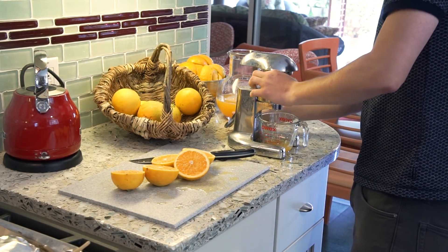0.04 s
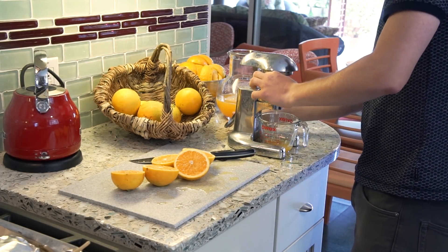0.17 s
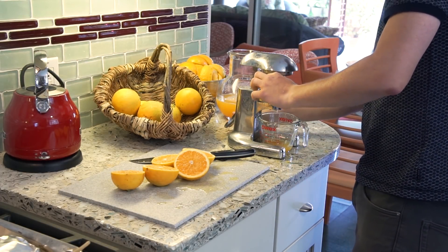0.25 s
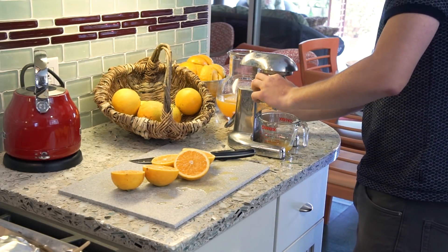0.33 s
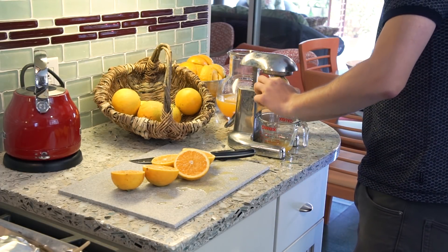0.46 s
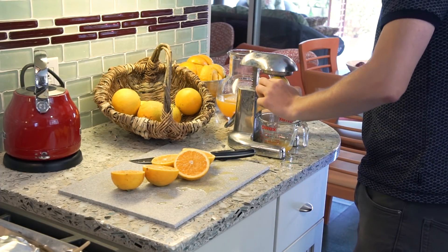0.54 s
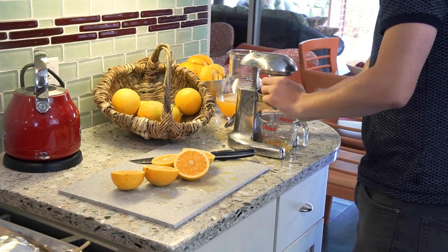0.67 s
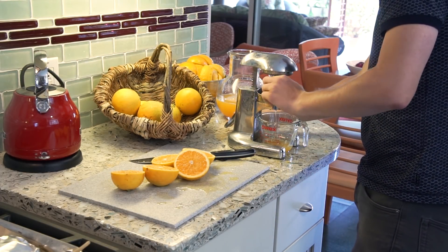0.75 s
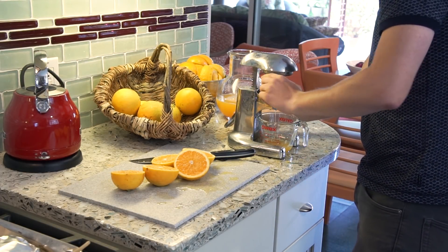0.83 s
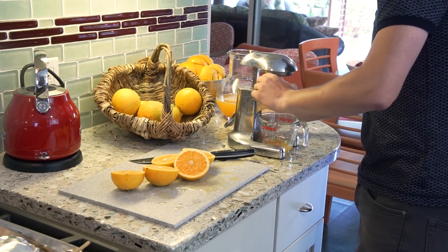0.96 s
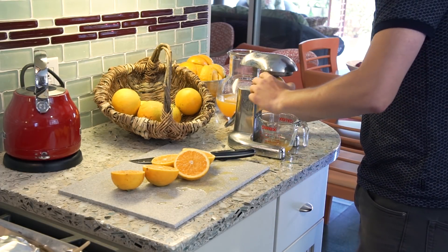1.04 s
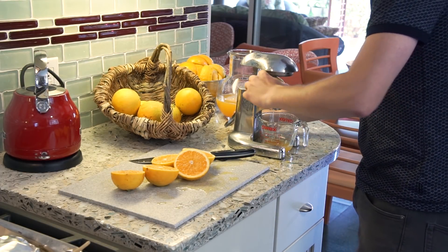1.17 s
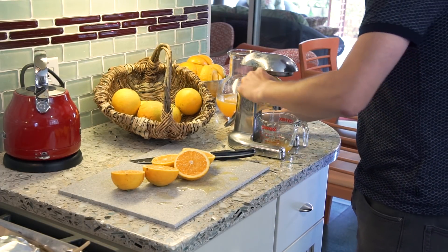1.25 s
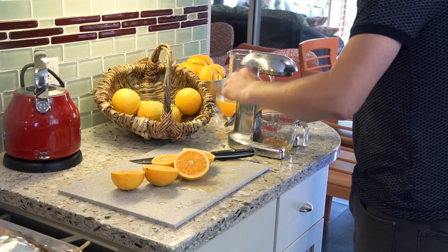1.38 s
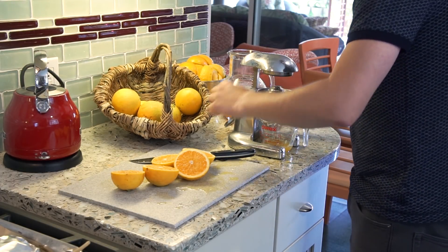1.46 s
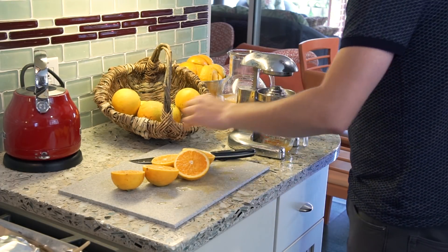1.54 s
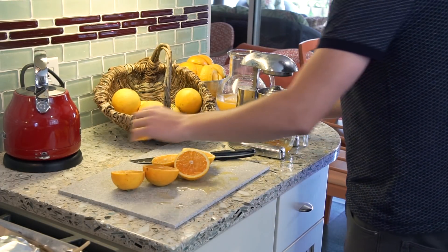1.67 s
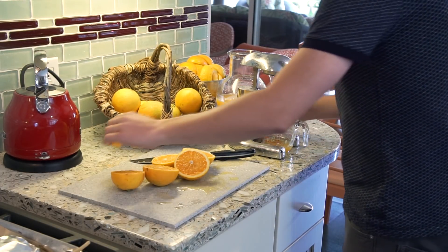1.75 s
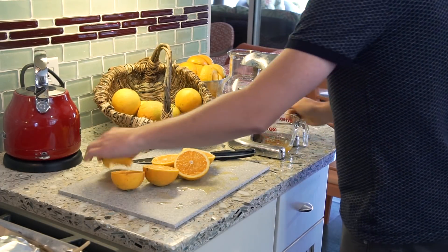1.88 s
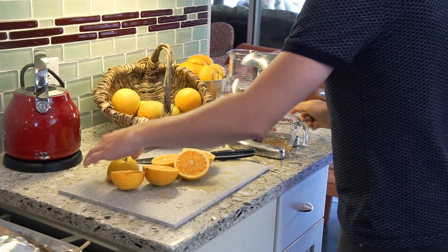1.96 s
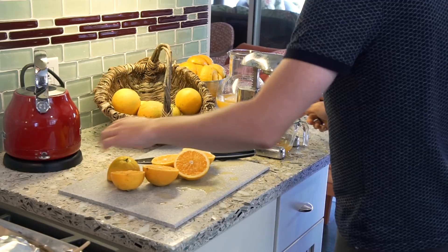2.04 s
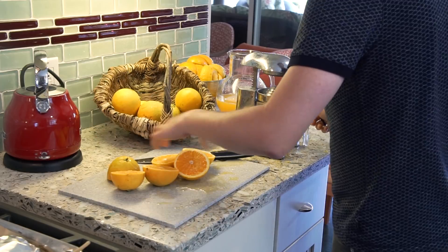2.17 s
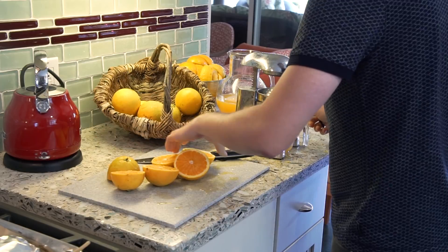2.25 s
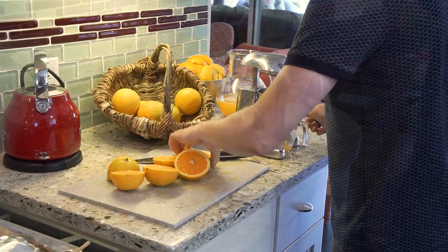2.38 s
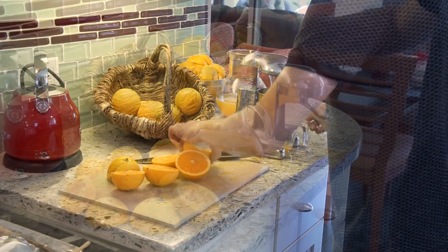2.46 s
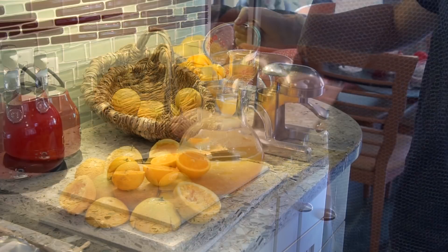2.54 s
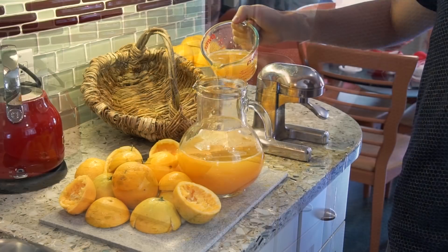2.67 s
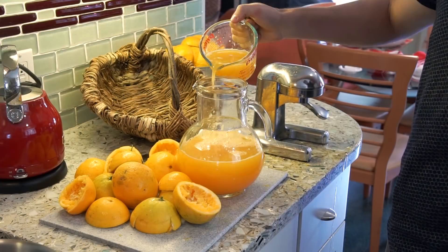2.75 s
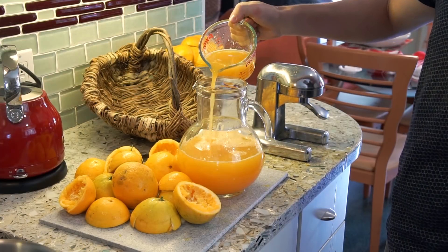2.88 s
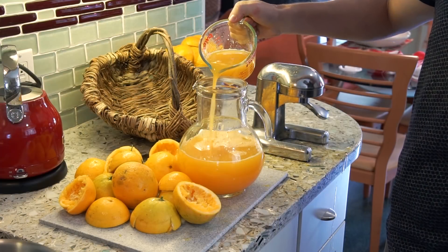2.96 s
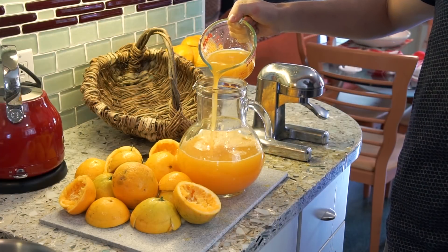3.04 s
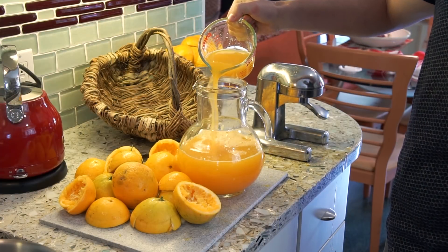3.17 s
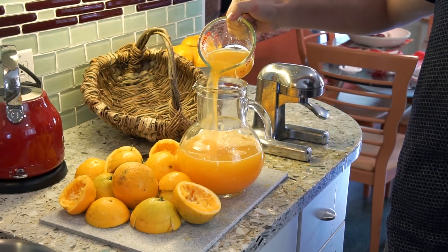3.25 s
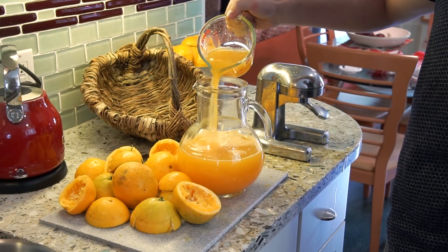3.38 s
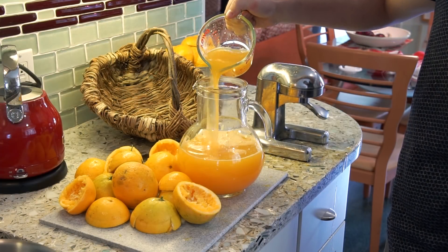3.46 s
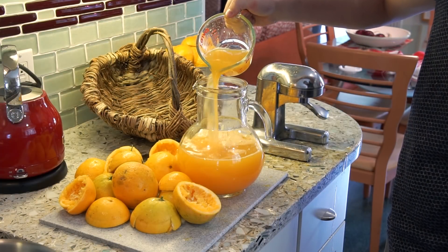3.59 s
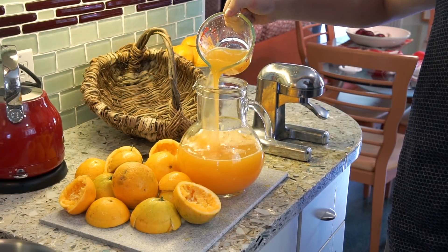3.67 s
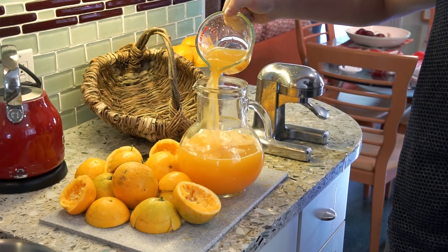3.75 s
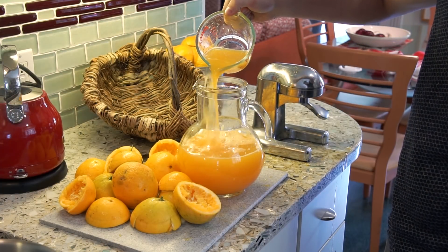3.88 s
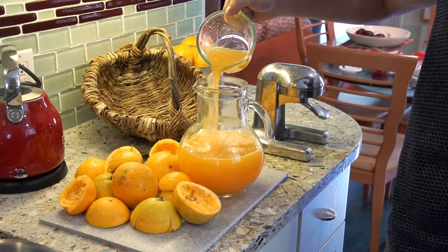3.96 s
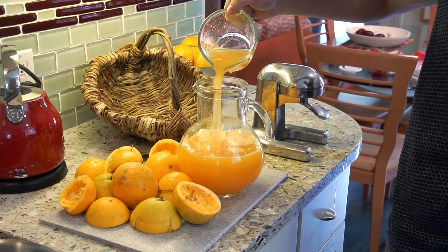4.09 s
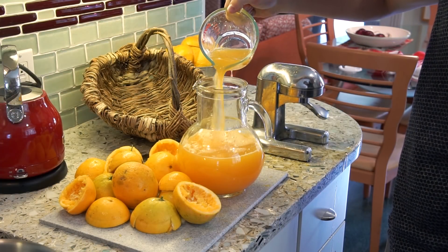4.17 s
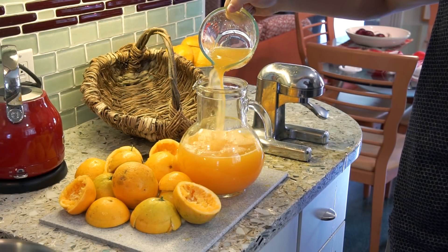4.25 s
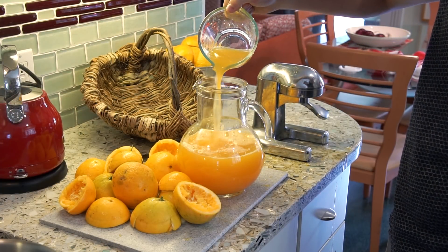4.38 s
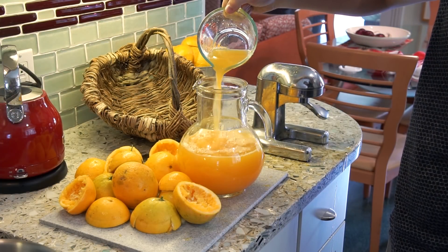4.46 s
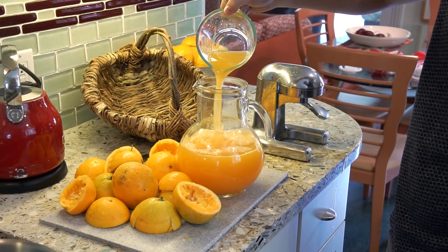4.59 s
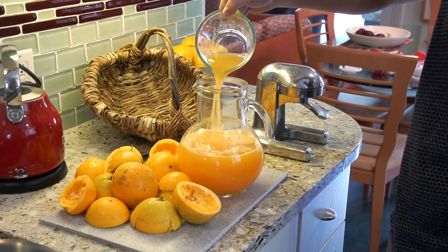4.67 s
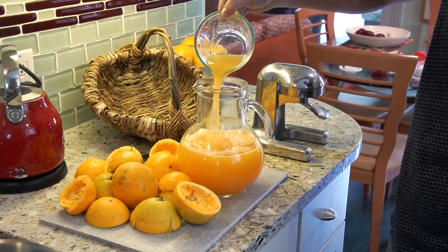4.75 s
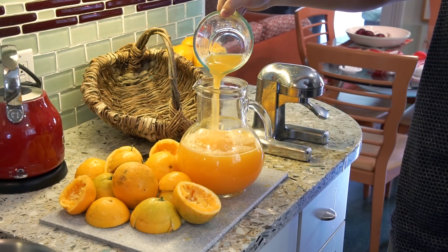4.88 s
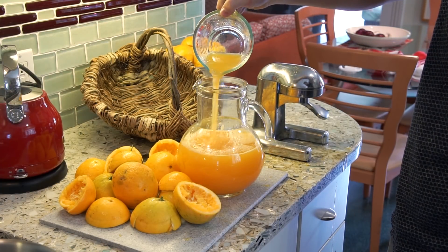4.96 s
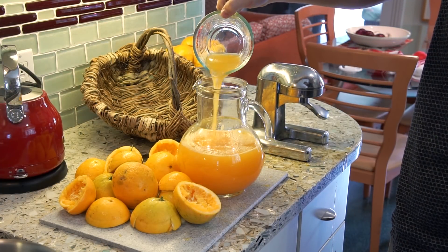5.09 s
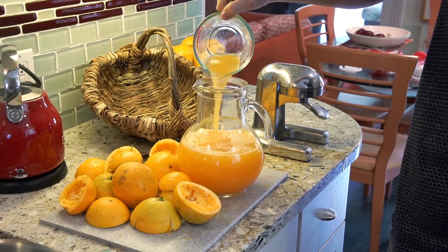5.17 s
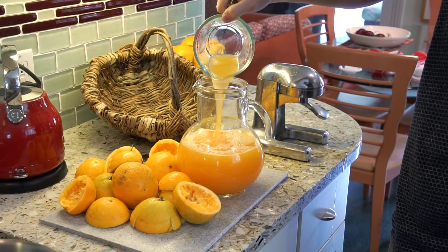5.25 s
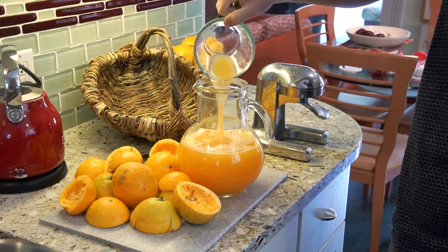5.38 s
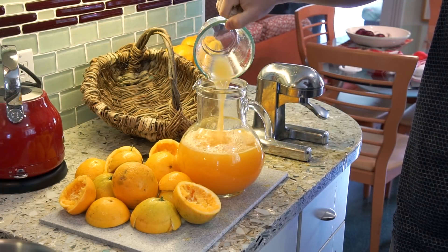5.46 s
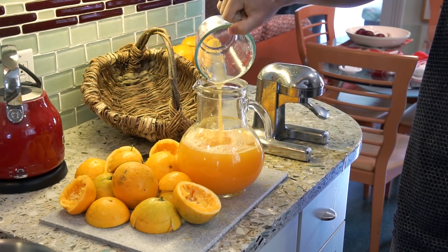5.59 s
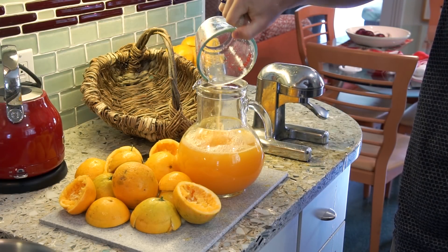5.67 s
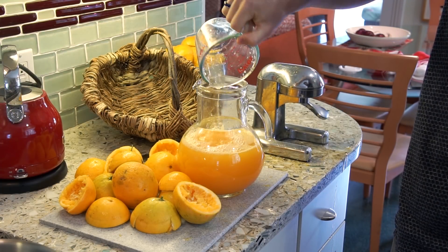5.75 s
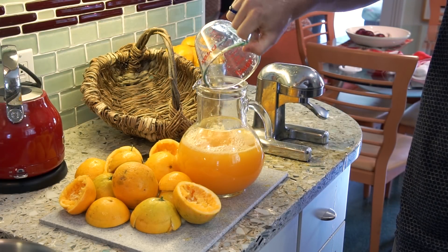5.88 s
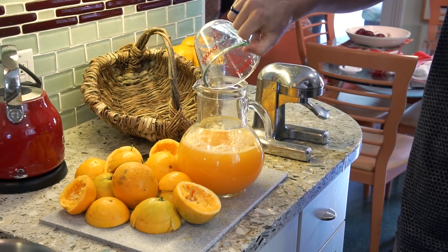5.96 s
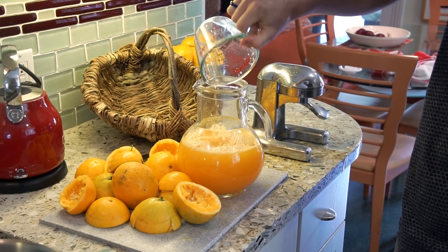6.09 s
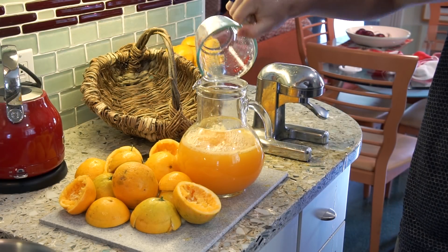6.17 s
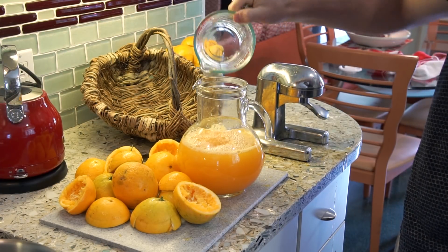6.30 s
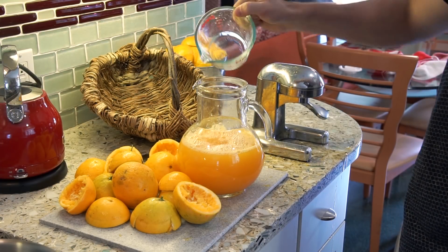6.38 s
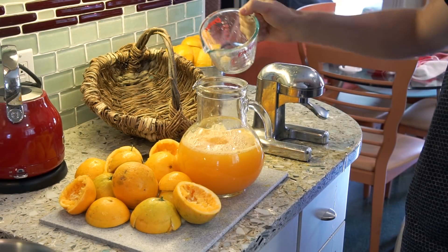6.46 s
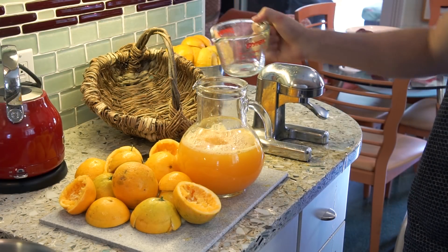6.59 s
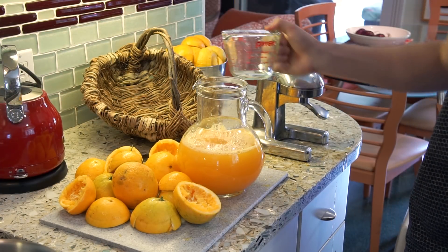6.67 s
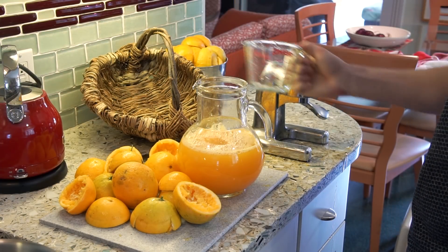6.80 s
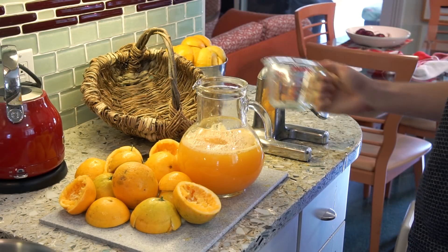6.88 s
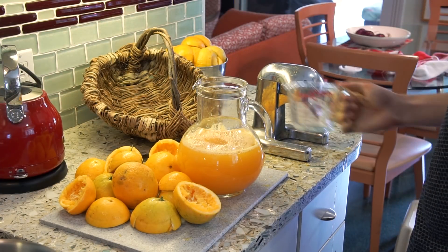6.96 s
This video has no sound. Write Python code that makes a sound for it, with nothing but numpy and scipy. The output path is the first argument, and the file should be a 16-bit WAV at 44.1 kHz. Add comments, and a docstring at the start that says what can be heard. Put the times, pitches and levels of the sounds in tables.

```python
"""Tiled kitchen: a metal lever juicer clanks on a stone counter under a steady rush of air.
Clanks are rattling noise bursts plus ringing modes of the cast body; the lever adds high clear notes.
Then orange juice runs from a glass cup into a pitcher: random ticks and short rising sines, rung by
the pitcher's air, make the spatter; sine gulps gurgle at a rising pitch; grains make the pulp slop in.
The cup clinks on the rim as the pour begins and ends, and the last drops plink."""
import sys
import numpy as np
from scipy import signal
from scipy.io import wavfile
from scipy.ndimage import uniform_filter1d

SR = 44100
rng = np.random.default_rng(int(sys.argv[2]) if len(sys.argv) > 2 else 0)


def dump(signal):
    """Clip the signal to [-1, 1] and save it as 16-bit WAV at the path in sys.argv[1]."""
    limited = np.clip(np.atleast_2d(signal).T, -1, 1)
    pcm = np.round(limited * 32767).astype(np.int16)
    wavfile.write(sys.argv[1], SR, pcm)


N = 310023
TIME_S = np.arange(N) / SR
RING_S = TIME_S[:SR // 2]  # time axis of one blow or note
BUBBLE_RISE = .054  # half the share by which a bubble climbs in pitch over its t60
LOW_HZ, FULL_HZ, NARROWING = 423.7, 535.7, 2.82  # gurgle before and after the pour; exponent of its climb
GURGLE_DB, GURGLE_DB_PER_FLOW_DB = -44.5, 0.83  # at full flow; dB per dB of flow
GULP_S, GULP_RISE = .16, 0.11  # length of a big gulp; its climb in pitch, as a share


def amp(db):
    """Decibels to gain."""
    return 10 ** (np.asarray(db) / 20)


def unit(x):
    """Scales to rms 1."""
    return x / np.sqrt(np.mean(x ** 2) + 1e-20)


def read(points, hz):
    """Reads a curve on a log-frequency axis."""
    point_hz, value = np.transpose(points)
    return np.interp(np.log(hz + 1), np.log(point_hz + 1), value)


def colour(x, points):
    """Filters by a spectrum in dB, with a minimum-phase, causal response."""
    size = 4096
    gain_db = read(points, abs(np.fft.fftfreq(size, 1 / SR)))
    log_gain = np.log(amp(gain_db))
    taps = np.fft.ifft(np.exp(np.conj(signal.hilbert(log_gain)))).real
    return signal.fftconvolve(x, taps[:size // 2])[:len(x)]


def resonate(x, hz, width_hz):
    """A resonance of peak gain 1: shifts hz to zero, smooths with one pole, shifts back."""
    turn = np.exp(2j * np.pi * np.cumsum(hz * np.ones(len(x))) / SR)
    pole = np.exp(-np.pi * width_hz / SR)
    smooth = signal.lfilter([1 - pole], [1, -pole], x / turn + 1e-18)
    return 2 * (turn * smooth).real


def burst(t60_s):
    """A contact that rattles out: decaying white noise."""
    return rng.standard_normal(len(RING_S)) * amp(-60 * RING_S / t60_s)


def ring(modes, t60_s):
    """Dying modes; each blow shares its force among them differently, and the grip detunes them a little."""
    sign = rng.choice([-1, 1], len(modes))
    uneven, detune = rng.standard_normal((2, len(modes)))
    tones = np.zeros(len(RING_S))
    for k, (hz, db) in enumerate(modes):
        own_hz = hz * (1 + 0.0035 * detune[k])
        tones += sign[k] * amp(db + 2 * uneven[k]) * np.cos(2 * np.pi * own_hz * RING_S)
    return tones * amp(-60 * RING_S / t60_s)


def blow(x, db):
    """Sets the rms level of a blow's first 20 ms."""
    return amp(db) * x / np.sqrt(np.mean(x[:SR // 50] ** 2) + 1e-20)


def add(mix, s, sound):
    """Mixes a sound in at a time in seconds."""
    part = mix[max(round(s * SR), 0):][:len(sound)]
    part += sound[:len(part)]


def kitchen(x, near_db, room_db, near_t60_s=0.029):
    """Direct sound, quick reflections from counter and tiles, and the tail of the room."""
    # Each row: frequency in Hz, t60 in s.
    tail_t60 = [(200, 0.5), (1200, 0.44), (4000, 0.39), (16000, 0.23)]
    echoes_per_s = np.array([[900], [4000]])
    noise = rng.standard_normal((2, len(RING_S)))
    near, far = noise * (rng.random((2, len(RING_S))) < echoes_per_s / SR)
    near = near * amp(-60 * RING_S / near_t60_s) * (RING_S > .001)
    # the tail dies at its own rate in each band
    hz, t, z = signal.stft(far * (RING_S > .008), SR, nperseg=256)
    decay = amp(-60 * t / read(tail_t60, hz)[:, None])
    far = signal.istft(z * decay, SR, nperseg=256)[1][:len(RING_S)]
    echo = amp(near_db) * near / np.linalg.norm(near) + amp(room_db) * far / np.linalg.norm(far)
    return x + signal.fftconvolve(x, echo)[:len(x)]


def juicer(modes_db=-1, body_t60_s=0.15, part_width_hz=42, ring_db_per_db=0.2):
    """Loose metal parts chatter for a moment and ring the cast body; the stone counter passes little bass."""
    # Blows. Each row: start in s, level in dB, chatter t60 in s, edge above 6.2 kHz in dB,
    # pitch of the part struck in Hz, its ring in dB against the rest.
    clanks = [(.003, -30.5, 0.36, -4.5, 809, -1.5), (0.0552, -22.5, 0.023, -3, 3670, -5),
              (0.0588, -25, 0.069, 8.5, 895, 1.5), (0.336, -31.5, 0.025, -6, 1097, -7.5),
              (0.751, -37.5, 0.087, -8, 3200, -11), (0.871, -30.5, 0.095, 9, 7340, -6),
              (0.8799, -24.5, 0.043, 1, 1029, 0), (.963, -28.5, 0.047, -3.5, 1014, -11),
              (1.053, -34, 0.03, -2, 2043, 4), (1.07, -37, 0.04, -3, 1860, -1),
              (1.093, -31.5, 0.019, -8, 1053, 4), (1.3657, -25.5, 0.053, 0, 1150, 6),
              (1.379, -18, 0.056, -4, 3420, -7), (1.392, -27.5, 0.16, 12, 1043, -3.5),
              (1.412, -25, 0.05, 0, 1164, -3.5)]
    # Modes of the cast body. Each row: frequency in Hz, relative level in dB.
    metal_modes = [(824, -1.5), (1021, 7.5), (1235, 5.5), (1378, -5.5), (1840, 4.5), (2895, -7), (3070, -3),
                   (3380, -16), (3730, -14), (4560, -4.5), (7390, -12.5)]
    # Metal on metal. Each row: frequency in Hz, relative density in dB per Hz.
    crack_spectrum = [(75, -70), (524, -7.5), (727, -13), (1030, -26), (1460, -0.5), (1860, -10),
                      (2530, -17.5), (3450, -6.5), (4590, -13), (6300, -25), (9210, -24.5), (16000, -38.5)]
    part_ref_hz, low_db, low_db_per_octave = 1000, -5, 0.5  # gain below 1.9 kHz, by the part's pitch
    out = np.zeros(N)
    hardest_db = max(row[1] for row in clanks)
    for s, db, chatter_t60_s, edge_db, part_hz, part_db in clanks:
        body_db = low_db + low_db_per_octave * np.log2(part_hz / part_ref_hz)
        # lighter blows ring the body less
        ring_db = modes_db + ring_db_per_db * (db - hardest_db)
        crack = blow(colour(burst(chatter_t60_s), crack_spectrum), 0)
        metal = crack + blow(ring(metal_modes, body_t60_s), ring_db)
        metal = colour(metal, [(1900, body_db), (2700, 0), (4900, 0), (6200, edge_db)])
        width_hz = part_width_hz * np.sqrt(part_hz / part_ref_hz)
        part = resonate(burst(chatter_t60_s), part_hz, width_hz)
        part = resonate(part, part_hz, part_hz / 2)
        struck = blow(metal, 0) + blow(part, part_db)
        add(out, s, blow(kitchen(struck, near_db=1.5, room_db=1.0), db))
    return signal.sosfilt(signal.butter(2, 150, "high", fs=SR, output="sos"), out)


def open_room(x, db=-19, t60_s=1.35):
    """Clanks linger faintly in the dining room beyond the counter: a long, coloured noise tail."""
    t = TIME_S[:2 * SR]
    decay = amp(-60 * t / t60_s)
    tail = colour(rng.standard_normal(len(t)) * decay, [(400, 5), (1100, -2.5), (3500, -2.0), (9000, 5.0)])
    return x + amp(db) * signal.fftconvolve(x, tail / np.linalg.norm(decay))[:N]


def lever():
    """The steel lever swings free and sings on: a high, clear note with a weaker one below it."""
    # Each row: start in s, level in dB, pitch in Hz, t60 in s.
    lever_rings = [(0.058, -34, 4450, 0.2), (0.334, -43, 4447, 0.13), (.871, -34, 4600, 0.27),
                   (0.964, -42, 4570, 0.19)]
    low_ratio, low_db = .675, -5
    out = np.zeros(N)
    for s, db, hz, t60_s in lever_rings:
        turn = 2 * np.pi * hz * RING_S
        note = np.sin(turn) + amp(low_db) * np.sin(low_ratio * turn)
        note = note * amp(-60 * RING_S / t60_s)
        add(out, s, blow(kitchen(note, near_db=-9, room_db=-9), db))
    return out


def jolts(knock_t60_s=0.14):
    """The juicer's heavy foot jolts: dull noise knocks of the counter."""
    # Each row: start in s, level in dB.
    foot_jolts = [(0.061, -35.5), (1.058, -34), (1.413, -38.5)]
    # The counter. Each row: frequency in Hz, relative density in dB per Hz.
    knock_spectrum = [(120, -38), (220, -6.5), (500, 7.5), (800, -1), (1700, 4), (5000, -25)]
    out = np.zeros(N)
    for s, db in foot_jolts:
        knock = colour(burst(knock_t60_s), knock_spectrum)
        add(out, s, blow(kitchen(knock, near_db=0.0, room_db=1), db))
    return out


def juice_flow():
    """Strength of the stream: every tilt of the cup builds, swells and ebbs by one rule."""
    # Trickle, main pour, dregs. Each row: start in s, start of the ebb in s,
    # level in dB ahead of the swell and of the stream's trim.
    pours = [(2.81, 3.15, -54), (3.17, 4.92, -39.5), (5.238, 5.52, -43)]
    build_s, swell_db_per_s, ebb_db_per_s = 0.2, 0.32, 33  # the swell runs on under the ebb
    flow = np.zeros(N)
    for start, ebb, db in pours:
        swell_db = swell_db_per_s * (TIME_S - start)
        ebb_db = ebb_db_per_s * np.maximum(TIME_S - ebb, 0)
        flow += np.clip((TIME_S - start) / build_s, 0, 1) * amp(db + swell_db - ebb_db)
    return flow


def bubble(hz, t60_s, rise):
    """A pocket of air rings and climbs in pitch as it nears the surface."""
    t = RING_S[:int(t60_s * SR)]
    tone = np.sin(2 * np.pi * hz * t * (1 + rise * t / t60_s))
    return tone * amp(-60 * t / t60_s) * (1 - np.exp(-t * hz))


def pitcher(x, direct_db=-3):
    """Sound made at the surface rings the air modes of the pitcher on its way out."""
    # Each row: frequency in Hz, relative density in dB per Hz.
    spatter_spectrum = [(350, -81), (600, -32), (698, -20), (1140, -1.5), (1610, 7.5), (1780, -33),
                        (2570, -17), (2950, -1), (3730, 2), (12200, -4.5), (16000, -10.5)]
    # Each row: frequency in Hz, width in Hz, gain in dB.
    air_modes = [(1662, 34.5, 9.5), (2986, 84, 4.5), (3940, 69, -4)]
    x = colour(x, spatter_spectrum)
    return amp(direct_db) * x + sum(amp(db) * resonate(x, hz, width_hz) for hz, width_hz, db in air_modes)


def stream(ticks_per_s=1300, bubbles_db=-1, beads_db=6, spatter_db=-1.1, count=3200):
    """Tiny impacts and separate little bubbles follow the flow."""
    ticks = rng.standard_normal(N) * (rng.random(N) < ticks_per_s / SR)
    fizz = np.zeros(N)
    for when, size, length, strength in rng.random((count, 4)):
        hz, cycles, db = 3000 * 5 ** size, 14 + 40 * length, 10 * strength
        level = amp(db) * np.sqrt(np.sqrt(hz) / cycles)
        add(fizz, when * N / SR, level * bubble(hz, cycles / hz, BUBBLE_RISE))
    # the stream breaks into beads, so the impacts come in clumps
    clumps = unit(uniform_filter1d(rng.standard_normal(N), size=700))
    beads = amp(beads_db * np.clip(clumps, -2, 2))
    surface = pitcher(unit(beads * ticks) + amp(bubbles_db) * unit(fizz))
    spatter = unit(kitchen(surface, near_db=-4, room_db=-7))
    return amp(spatter_db) * juice_flow() * spatter


def gulp(hz, length_s):
    """A big pocket of air swells, climbs in pitch and fades."""
    t = np.arange(0, length_s, 1 / SR)
    turns = np.cumsum(hz * (1 + GULP_RISE * (t - length_s / 2) / GULP_S)) / SR
    return np.sin(2 * np.pi * (turns + rng.random())) * np.sin(np.pi * t / length_s) ** 2


def gurgle(small_s=0.062, scatter=0.0547, uneven_db=2, count=220):
    """The stream drags down air in quick small gulps, whose note climbs as the pitcher fills, and big ones."""
    # Big gulps. Each row: middle in s, level in dB ahead of the echoes, mid pitch in Hz.
    big_gulps = [(3.47, -37.5, 420), (3.61, -41, 418), (4.538, -37, 439.5), (5.04, -37.5, 466.7),
                 (5.678, -40, 452.6)]
    flow, out = juice_flow(), np.zeros(N)
    # the glass narrows upward, so the note climbs ever faster with the share poured
    poured = np.cumsum(flow) / flow.sum()
    note_hz = LOW_HZ + (FULL_HZ - LOW_HZ) * poured ** NARROWING
    for k, (late, detune, size) in enumerate(rng.standard_normal((count, 3))):
        at = int(np.clip((k + np.tanh(late) / 2) * N / count, 0, N - 1))
        follow = (flow[at] / flow.max()) ** GURGLE_DB_PER_FLOW_DB
        strength = follow * amp(GURGLE_DB + uneven_db * size)
        own_hz = note_hz[at] * (1 + scatter * detune)
        add(out, at / SR - small_s / 2, strength * gulp(own_hz, small_s))
    for s, db, hz in big_gulps:
        add(out, s - GULP_S / 2, amp(db) * gulp(hz, GULP_S))
    return kitchen(out, near_db=-15, room_db=-4.5)


def splats(dent_db=0, dent_q=6):
    """The stream breaks and slaps the surface; the dent that it leaves colours each slap."""
    # Each row: start in s, level in dB, pitch of the dent in Hz.
    slaps = [(3.131, -35.5, 6400), (3.567, -37, 6900), (3.7345, -27, 5820), (3.877, -31, 4200),
             (4.004, -35, 10000), (4.082, -31.5, 3200), (4.182, -31, 4350), (4.284, -35, 3480),
             (4.346, -35.5, 3200), (4.424, -35.5, 3330), (4.758, -35, 3450), (5.103, -38.5, 6740),
             (5.453, -42, 3480)]
    out = np.zeros(N)
    for s, db, hz in slaps:
        slap = burst(.021)
        dent = resonate(resonate(slap, hz, hz / dent_q), hz, hz / 2)
        slap = colour(pitcher(slap), [(1500, -4), (5500, 11.0), (14000, 5)])
        landed = blow(slap, 0) + blow(dent, dent_db)
        add(out, s, blow(kitchen(landed, near_db=5.5, room_db=4.5), db))
    return out


def cluster(hz, cycles, count=3):
    """A pocket of air rings and sheds a few weaker bubbles of nearly its own pitch."""
    mean_delay_s, pitch_spread, shed_db = .008, .06, -8
    out = np.zeros(len(RING_S))
    add(out, 0, bubble(hz, cycles / hz, BUBBLE_RISE))
    for late_s, detune in zip(rng.exponential(mean_delay_s, count), rng.standard_normal(count)):
        own_hz = hz * np.exp(pitch_spread * detune)
        add(out, late_s, amp(shed_db) * bubble(own_hz, cycles / own_hz, BUBBLE_RISE))
    return out


def bubbles(t60_cycles=56):
    """Larger pockets of air under the stream, each with its own note; the higher ones die sooner."""
    # Each row: start in s, level in dB ahead of the echoes, pitch in Hz.
    pockets = [(2.929, -30, 1340), (3.146, -33.5, 2026), (3.172, -32, 1353), (3.213, -31, 3320),
               (3.355, -29.5, 5400), (3.436, -24, 4390), (3.559, -22.5, 3150), (3.894, -24, 4940),
               (3.91, -22, 3760), (3.961, -30, 3420), (4.031, -28, 5900), (4.143, -27, 3260),
               (4.229, -24, 7600), (4.264, -26, 3660), (4.463, -27, 5550), (4.536, -31, 2990),
               (4.97, -30.5, 1330), (5.013, -31, 5270), (5.519, -24, 3300)]
    out = np.zeros(N)
    for s, db, hz in pockets:
        note = cluster(hz, t60_cycles)
        add(out, s, amp(db) * kitchen(note, near_db=4.0, room_db=1))
    return out


def slops(grains_per_s=5000, plop_db=-16):
    """Thick pulp lands in a dense, wide swell of tiny impacts around a hollow plop."""
    # Lumps. Each row: peak in s, level in dB ahead of weight and echoes, rise in s, fall in s,
    # pitch of the plop in Hz, weight below 900 Hz in dB.
    lumps = [(4.703, -33.5, 0.041, 0.019, 241, -2), (4.98, -43.5, 0.08, 0.13, 1660, 0),
             (5.547, -27.5, 0.014, 0.017, 1000, -0.5)]
    # Each row: frequency in Hz, relative density in dB per Hz.
    pulp_spectrum = [(125, -32), (230, -10.5), (547, 4), (1080, -6), (1610, -1), (2000, -9.5),
                     (6700, -10.5), (16000, -15.5)]
    out = np.zeros(N)
    for s, db, rise_s, fall_s, hz, weight_db in lumps:
        impacts = rng.standard_normal(N) * (rng.random(N) < grains_per_s / SR)
        grains = unit(colour(impacts, pulp_spectrum))
        plop = unit(resonate(resonate(grains, hz, hz / 10), hz, hz / 2))
        grains = colour(grains, [(900, weight_db), (1400, 0)])
        swell = np.exp(-np.maximum((s - TIME_S) / rise_s, (TIME_S - s) / fall_s))
        out += amp(db) * swell * (grains + amp(plop_db) * plop)
    return kitchen(out, near_db=-13.0, room_db=-1.0)


def clink(rim_t60_s=0.083):
    """The cup's lip chatters on the pitcher's rim; the hand damps the cup, while the rim rings clear."""
    # Each row: start in s, level in dB, ring of the rim against the cup in dB.
    touches = [(2.9, -37, 7), (5.737, -29, -25)]
    # Modes of the cup's lip. Each row: frequency in Hz, relative level in dB.
    cup_modes = [(3530, -2), (3700, -4.5), (4190, -1), (4700, 8)]
    # Modes of the pitcher's rim. Each row: frequency in Hz, relative level in dB.
    rim_modes = [(1650, 7), (2982, 3), (3640, 3), (4020, 3)]
    out = np.zeros(N)
    for s, db, rim_db in touches:
        cup = blow(ring(cup_modes, .018), -8) + blow(burst(0.045), 0)
        cup = colour(cup, [(2000, -31), (3300, 7.5), (4800, 2.0), (5300, -9), (7000, 1.5), (15000, -30)])
        touch = blow(cup, 0) + blow(ring(rim_modes, rim_t60_s), rim_db)
        add(out, s, blow(kitchen(touch, near_db=-5, room_db=-2.5), db))
    return out


def drips(t60_s=0.06):
    """Lone drops, from the juicer and later the cup's lip: each a short, clean sine plink."""
    # Each row: start in s, level in dB ahead of the echoes, pitch in Hz.
    drops = [(1.709, -38.5, 2180), (1.894, -40.5, 2790), (3.698, -29.5, 2410), (5.964, -39.5, 2100),
             (6.088, -34, 2090), (6.21, -31.5, 1675), (6.587, -28, 1710), (6.595, -33.5, 2140)]
    out = np.zeros(N)
    for s, db, hz in drops:
        onset = 1 - np.exp(-RING_S * hz / 2)
        note = np.sin(2 * np.pi * hz * RING_S) * amp(-60 * RING_S / t60_s) * onset
        add(out, s, amp(db) * kitchen(note, near_db=-7, room_db=-7))
    return out


def rustle(db=-59, peak_s=2.0, width_s=.055):
    """A faint brush of hand and sleeve on the reach for the next orange half: high-passed grains."""
    grains = rng.standard_normal(N) * (rng.random(N) < 700 / SR)
    crisp = signal.sosfilt(signal.butter(2, 2500, "high", fs=SR, output="sos"), grains)
    return amp(db) * unit(crisp) * np.exp(-((TIME_S - peak_s) / width_s) ** 2)


def room_air(press_db=-47, pour_db=-45.5, change_s=2.6, fade_s=0.029):
    """A rush of air, rippled by the room; it whines faintly during the pressing, is duller during the pour."""
    # While pressing. Each row: frequency in Hz, relative density in dB per Hz.
    press_spectrum = [(45, -38), (203, -23), (240, -6), (284, -11.5), (380, 1.5), (572, 2.5), (2250, -5.5),
                      (5400, -22.5), (7390, -25), (16000, -32.5)]
    # While pouring. Each row: frequency in Hz, relative density in dB per Hz.
    pour_spectrum = [(50, -47), (175, -30), (260, -16), (330, -5), (390, 0), (470, -8), (572, -4),
                     (800, -11), (1000, -8), (2150, -11), (6200, -32), (16000, -48.5)]
    # The whine: frequency in Hz, width in Hz, gain in dB ahead of the pressing spectrum.
    whine_hz, whine_width_hz, whine_db = (7400, 380, 1)
    noise = kitchen(rng.standard_normal(N + SR), near_db=-13.0, room_db=-12.0)[SR:]
    whine = amp(whine_db) * resonate(noise, whine_hz, whine_width_hz)
    later = np.clip((TIME_S - change_s) / fade_s + .5, 0, 1)
    pressing = amp(press_db) * unit(colour(noise + whine, press_spectrum))
    pouring = amp(pour_db) * unit(colour(noise, pour_spectrum))
    return (1 - later) * pressing + later * pouring


def scene():
    """All sources, heard from one place."""
    pressing = open_room(juicer()) + lever() + rustle()
    pouring = stream() + gurgle() + splats() + bubbles() + drips() + slops() + clink()
    return (pressing + pouring + jolts() + room_air())[None]


def record(dry, edge_hz=16050):
    """Band limit: a steep linear-phase low-pass."""
    taps = signal.firwin(511, edge_hz, window=("kaiser", 9), fs=SR)
    return signal.oaconvolve(dry, taps[None], "same")


dry = scene()
out = record(dry)
dump(out)
```